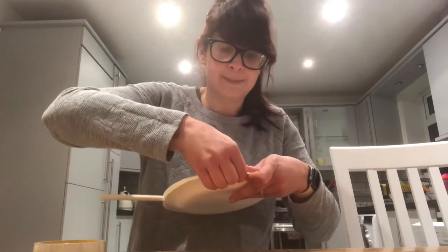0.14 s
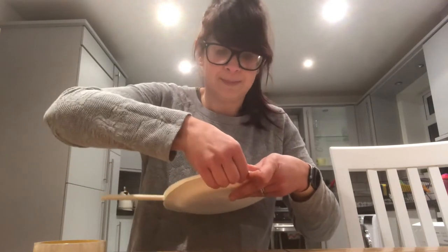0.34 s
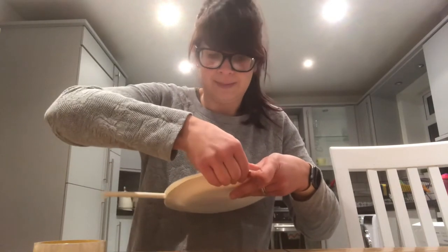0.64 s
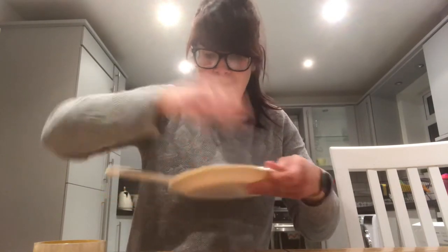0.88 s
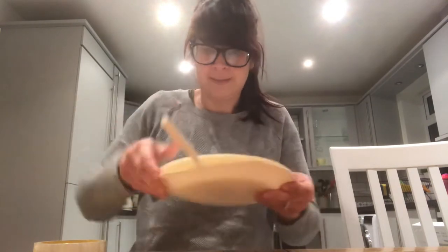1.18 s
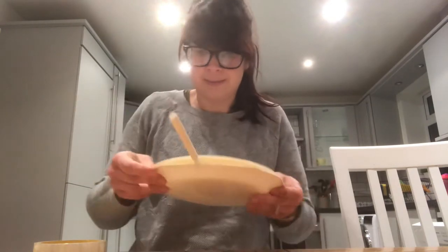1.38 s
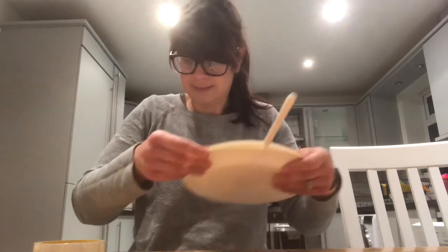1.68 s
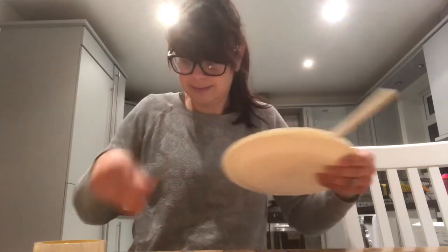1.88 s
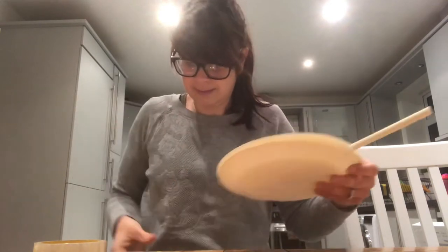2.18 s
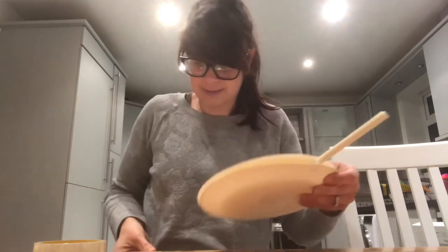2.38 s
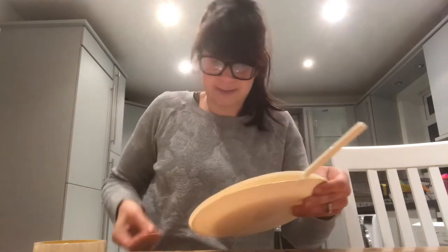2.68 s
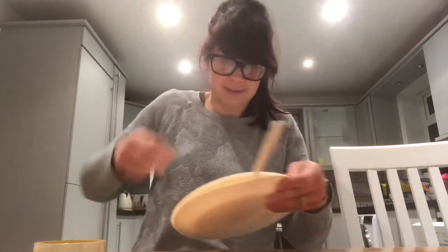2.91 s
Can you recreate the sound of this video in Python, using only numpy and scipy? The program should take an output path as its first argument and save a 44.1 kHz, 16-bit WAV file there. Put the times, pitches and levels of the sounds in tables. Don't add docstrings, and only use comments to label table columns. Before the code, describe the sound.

Paper plates crackle and click in handling, then sticky tape rips off in a loud burst

```python
import sys
import numpy as np
from scipy import signal
from scipy.fft import rfft, irfft, next_fast_len
from scipy.io import wavfile
from scipy.ndimage import uniform_filter1d, map_coordinates

SR = 44100
rng = np.random.default_rng(int(sys.argv[2]) if len(sys.argv) > 2 else 0)


def boost(x):
    u = np.asarray(x, float) / 20
    return 10 ** u


def inscribe(sig):
    pcm = np.round(np.clip(np.atleast_2d(sig).T, -1, 1) * 32767)
    wavfile.write(sys.argv[1], SR, pcm.astype(np.int16))


N = 134505

# [f/Hz, width/Hz, level/dB]
PLATE_MODES = [(437, 400, -3.5), (690, 530, -4), (1150, 250, 1.5), (1650, 192, 3.5), (3330, 2200, 0),
               (4450, 1120, 1.5), (6060, 1270, -2)]
PLATE_DETUNE = 0.042


def unit(x):
    return x / np.sqrt(np.mean(x ** 2) + 1e-20)


def along(points, hz):
    f, v = np.transpose(points)
    return np.interp(np.log(hz + 1), np.log(f + 1), v)


def filtered(x, response):
    m = next_fast_len(len(x) + 4096)
    spectrum = rfft(x, m) * response(np.fft.rfftfreq(m, 1 / SR))
    return irfft(spectrum, m)[:len(x)]


def peak(f, hz, width_hz):
    return 1j * f * width_hz / (hz * hz - f * f + 1j * f * width_hz + 1e-9)


def tilt(f, db_per_octave):
    return boost(db_per_octave * np.log2(np.maximum(f, 300) / 2000))


def new_grip():
    return PLATE_DETUNE * rng.standard_normal(len(PLATE_MODES))


def plate(f, detune, ring_hz, ring_db, q):
    rest = 0
    for k, (hz, width_hz, db) in enumerate(PLATE_MODES):
        rest = rest + (-1) ** k * boost(db) * peak(f, hz * (1 + detune[k]), width_hz)
    return np.abs(rest) + boost(ring_db) * peak(f, ring_hz, ring_hz / q)


def add(track, s, piece):
    i = round(s * SR)
    piece = piece[max(-i, 0):N - i]
    track[max(i, 0):][:len(piece)] += piece


def patchy(x, depth_db):
    z = signal.stft(x, nperseg=256)[2]
    field = uniform_filter1d(rng.standard_normal(z.shape), size=4, axis=0)
    field = uniform_filter1d(field, size=8, axis=1)
    return signal.istft(z * boost(depth_db * unit(field)), nperseg=256)[1][:len(x)]


def buckles():
    # [t/s, level/dB, body over snap/dB, tilt/(dB/octave), ring
    # f/Hz]
    pops = [(.0708, -52.5, 4.5, -1, 1800), (.108, -54, 3, -7, 2600), (.133, -41, -23, -6, 2480),
            (.146, -38.5, -30, 0, 6000), (.152, -32.5, -2, 1, 3620), (0.1531, -48, 9.5, -8, 503),
            (0.16, -37.5, -1, 0, 1450), (.1622, -37, 3, -7, 800), (0.174, -36.5, 1.5, -5.5, 1390),
            (.1742, -41.5, 4, -12, 646), (0.2159, -45, 6, -18, 1010), (.219, -39, 1, -7, 1240),
            (0.2201, -43, 4, -7.5, 590), (0.2305, -25, -14.5, -2, 3750), (.247, -41, -3, -6, 1390),
            (.359, -49, -10, 5, 8000), (0.411, -41, -3.5, -4, 1130), (.443, -54, -15, 7, 3600),
            (.463, -28, -2.5, 1.5, 507), (.469, -32, -15, -4.5, 3660), (0.5079, -28.5, -9.5, -7, 1570),
            (.525, -36.5, 0, 4.5, 870), (0.53, -35.5, -3, 3, 1100), (0.7225, -45, 2, 1, 4570),
            (0.7244, -29, -1, -4, 3640), (.7260, -32.5, 8.5, -6, 1400), (0.7272, -40.5, 7, -10, 428),
            (0.9383, -36.5, -3, -2.5, 3560), (.9388, -41.5, 9, -8.5, 1800),
            (0.9395, -45, 10, -7.5, 1050),
            (1.0913, -39.5, 4.4, -8, 1760), (1.094, -41.5, 3.7, -12, 880), (1.098, -41.5, 8.5, -11.5, 790),
             (1.103, -43.5, 5.2, -8, 1120), (1.11, -51, 4.6, -3, 1010), (1.136, -47, 5.1, -29, 1030),
             (1.198, -55, 8.7, 3, 1190), (1.2132, -34, 1.4, -8, 1820), (1.219, -41, 9, -6, 1650),
             (1.2237, -45.5, 7, -23, 1210), (1.240, -52, 5.2, -11.5, 403), (1.2552, -39.5, 3.5, -4, 1940),
             (1.385, -46, 2.3, 0, 1150), (1.473, -52, 6, -11, 1130), (1.5103, -42, 5.7, -6, 1640),
             (1.519, -45.5, 7.4, -2, 1290), (1.571, -59, 6, -3, 1700), (1.587, -57, 3.7, -8, 1500),
             (2.270, -57, 4, -2, 5550), (2.274, -61, 3, -4, 4330), (2.957, -54.5, 4.9, -3, 1100),
             (2.964, -58, 3.4, -7, 6500), (3.041, -48.5, 4.9, -5, 1180)]
    snap_t60_s, body_t60_s, body_attack_s = 0.008, 0.02, 0.0005
    snap_kick, body_kick = 3.5, 2.5
    out, t = np.zeros(N), np.arange(SR // 16) / SR
    for s, db, body_db, slope, hz in pops:
        a, b = rng.standard_normal((2, len(t)))
        detune = new_grip()

        a[:2] += snap_kick
        snap = filtered(a * boost(-60 * t / snap_t60_s), lambda f: tilt(f, slope) * peak(f, 4170, 6100))

        bump = np.exp(-(t * SR / 4 - 2) ** 2)
        b = b * (1 - np.exp(-t / body_attack_s)) + body_kick * bump
        body = filtered(b * boost(-60 * t / body_t60_s), lambda f: plate(f, detune, hz, ring_db=6, q=4.5)
                        * tilt(f, slope / 2) * peak(f, 3 * hz, 15 * hz) ** 2)

        click = snap / np.abs(snap).max() + boost(body_db) * body / np.abs(body).max()
        add(out, s, boost(db) * click)
    return out


def rubs():
    # [t/s, length/s, level/dB, tilt/(dB/octave), ring f/Hz]
    strokes = [(-.03, 0.055, -63, 1.5, 11400), (0.549, 0.16, -68, -2.5, 1090),
               (0.119, 0.17, -60.5, 0, 1280), (0.411, 0.056, -63, -1.5, 1070),
               (0.461, 0.13, -61.5, -1, 1010), (0.67, 0.067, -55.5, -1.8, 1700),
               (0.731, 0.091, -59.5, -2.5, 620), (0.957, 0.033, -61, -2.5, 1040),
               (1.03, 0.071, -58, 1.7, 4150), (1.082, 0.026, -51.5, 0.5, 4100),
               (1.11, .05, -55.5, -1.5, 1184), (1.169, 0.093, -52, -3, 1210), (1.276, .11, -53, -2, 1150),
               (1.437, 0.032, -54, 2, 1600), (1.46, 0.061, -53.5, 1.5, 4360),
               (1.452, 0.07, -55.5, -0.5, 1170), (1.507, 0.071, -48, -0.1, 1650),
               (1.516, 0.065, -50.5, 3.5, 4450), (1.598, 0.061, -57, -1, 1230),
               (1.866, 0.11, -62.5, 0.5, 990), (1.996, 0.046, -68.5, -0.5, 3800),
               (2.109, .15, -67, 0.5, 1240), (2.948, 0.023, -59.5, -1.5, 1110),
               (2.992, 0.049, -67.5, -3, 1110)]
    # [f/Hz, density level/dB]
    card_colour = [(120, -4.5), (200, -12), (333, -9.5), (379, -8.5), (1600, -7.5), (2100, -10),
                   (4350, -11.5), (15600, -15)]
    attack_s, release_s, grains_per_s = 0.014, 0.012, 14000
    grain_spread_db, flutter_db, broad_db = 2, 2.15, -9
    out, t = np.zeros(N), np.arange(SR // 3) / SR
    for s, length, db, slope, hz in strokes:
        hit, size, sign = rng.random((3, len(t)))
        grain_gain = boost(-grain_spread_db * np.log(size + 0.007))
        grains = (hit < grains_per_s / SR) * grain_gain * (sign - 0.5)
        detune = new_grip()
        sound = filtered(grains, lambda f: boost(along(card_colour, f)) * tilt(f, slope)
                         * (boost(broad_db) + np.abs(plate(f, detune, hz, ring_db=3, q=7))))
        flutter = np.tanh(map_coordinates(rng.standard_normal(40), [t * 90]))
        shape = np.clip(t / attack_s, 0, 1) * np.exp(-np.maximum(t - length, 0) / release_s)
        add(out, s, boost(db + flutter_db * flutter) * shape * unit(patchy(sound, depth_db=2.5)))
    return out


def thuds():
    thud_times = [.218, .463, .530, .726, .755, 1.095, 1.150, 1.215, 1.222, 1.380, 2.285, 2.575, 2.582,
                  2.585, 2.610]
    # [level/dB, f/Hz]
    thud_tones = [(-55.5, 121), (-41, 338), (-46.5, 135), (-47, 440), (-43.5, 330), (-55, 183), (-52, 80),
                  (-47, 97), (-41.5, 397), (-46.5, 318), (-60.5, 68), (-33, 510), (-40.5, 324), (-40, 165),
                  (-49.5, 58.5)]
    cycles = 5.34
    out, t = np.zeros(N), np.arange(SR // 8) / SR
    for s, (db, hz) in zip(thud_times, thud_tones):
        decay = boost(db - 60 * t * hz / (3 * cycles))
        onset = 1 - np.exp(-t * hz * 3)
        add(out, s, decay * onset * np.sin(2 * np.pi * hz * t))
    return out


def tape():
    # [t/s, level/dB, crackle length/s, brightest f/Hz, table ring/dB]
    slips = [(2.4666, -40, 0.0012, 7200, 5), (2.4933, -19.5, 0.00089, 11200, 2),
             (2.4949, -26, 0.0011, 4490, 6), (2.4993, -40, .0006, 9000, -6),
             (2.504, -40, 0.0022, 12000, -6), (2.5117, -40, .001, 13000, -4), (2.5138, -32, .0011, 7000, 0),
             (2.5214, -19, 0.0011, 6540, 4), (2.5219, -18, 0.0015, 4200, -2.5),
             (2.523, -21, 0.0013, 2980, 1), (2.5246, -22, 0.0031, 2640, 8.5),
             (2.5322, -20, 0.0016, 5000, -1), (2.5348, -21, 0.0014, 6000, -13),
             (2.5425, -25, 0.0012, 4370, -4), (2.545, -18, .0016, 7960, -15),
             (2.5496, -13, 0.00055, 5900, -9), (2.5516, -20, 0.00081, 5500, 2),
             (2.56, -16.5, 0.0018, 6400, 5), (2.5634, -15, 0.0027, 5470, -6.5),
             (2.5667, -24.5, 0.0014, 6000, -1), (2.5721, -10, 0.00074, 14700, -2),
             (2.5783, -14.5, 0.0014, 8600, -2.5), (2.5801, -11, 0.0017, 13600, -9),
             (2.5823, -19.5, 0.0017, 5960, 9.5), (2.587, -20, 0.0036, 6100, 0),
             (2.5904, -19.5, 0.0031, 14100, -11), (2.592, -19, .0022, 9260, -4),
             (2.5947, -18.5, 0.0019, 6100, 5.5), (2.5996, -14.5, .0012, 11100, 5),
             (2.6016, -26, .002, 7000, 9)]
    # [f/Hz, level/dB]
    strip_colour = [(180, -5), (300, 10), (378, -1), (509, -3), (1220, -1.5), (1940, -0.5), (6080, -4),
                    (15600, -5)]
    crackle_db, spike_db, slip_peak_db, slip_q = -8, -0.5, 4, 2
    table_hz, table_width_hz, film_low_hz = 1180, 600, 1500
    out, t = np.zeros(N), np.arange(SR // 50) / SR
    for s, db, length, hz, table_db in slips:
        noise, size = rng.standard_normal((2, len(t)))
        grit = noise * boost(3.2 * uniform_filter1d(size, size=5))
        crackle = grit * np.exp(-(t / length) ** 1.4) * boost(crackle_db)
        crackle[:2] -= boost(spike_db) * min(1, (0.0031 / length) ** 2)

        def film_and_table(f):
            film = (1 + boost(slip_peak_db) * peak(f, hz, hz / slip_q)) * 1j * f / (film_low_hz + 1j * f)
            return film + boost(table_db) * peak(f, table_hz, table_width_hz)

        add(out, s, boost(db - 3.5) * filtered(crackle, film_and_table))
    return filtered(out, lambda f: boost(along(strip_colour, f) + 4.0))


def kitchen(x):
    # [f/Hz, t60/s]
    decay_times = [(150, 0.47), (1000, 0.65), (4000, 0.56), (8000, 0.46), (14000, 0.34)]
    wall_s = 0.0013
    out, hop = np.zeros(N + 2 * SR), SR // 8
    for i in range(0, N, hop):
        hz, t, z = signal.stft(rng.standard_normal(SR * 3 // 4), SR, nperseg=256)
        fade = boost(-60 * t / along(decay_times, hz)[:, None])
        tail = signal.istft(z * fade, SR, nperseg=256)[1]
        tail *= 1 - np.exp(-np.arange(len(tail)) / (SR * wall_s))
        wet = signal.fftconvolve(x[i:i + hop], tail / np.linalg.norm(tail))
        out[i:i + len(wet)] += wet
    return out[:N]


def floor():
    # [f/Hz, density level/dB]
    hiss_colour = [(15, -53), (25, -11), (91, -2.5), (144, -7.5), (315, -9), (485, -17.5), (570, -14.5),
                   (1250, -19), (15700, -37.5)]
    # [t/s, level/dB]
    drone_swell = [(0, -79), (.5, -76), (1.2, -87), (1.9, -64), (2.5, -68), (3.05, -100)]
    hiss_db, drone_hz, drone_width_hz = -63, 304, 76
    hiss = unit(filtered(rng.standard_normal(N), lambda f: boost(along(hiss_colour, f))))
    drone = unit(filtered(rng.standard_normal(N), lambda f: peak(f, drone_hz, drone_width_hz) ** 2))
    drone_db = np.interp(np.arange(N) / SR, *np.transpose(drone_swell))
    return boost(hiss_db) * hiss + boost(drone_db) * drone


def scene():
    card = buckles() + rubs() + thuds()
    strip = tape()
    room = kitchen(boost(-7.5) * card + boost(-5.5) * strip)
    return (card + strip + room + floor())[None]


def band_limit(x):
    return signal.sosfilt(signal.butter(12, 16830, fs=SR, output="sos"), x)


def record(dry):
    # [f/Hz, width/Hz, depth 0-1]
    notches = [(2040, 350, 0.18), (5000, 236, 0.45), (7700, 630, 0.23), (10400, 1500, 0.43)]
    # [f/Hz, level/dB]
    mic_band = [(20, -20), (45, 0), (15300, 0), (15720, -5), (15850, -28), (16400, -33), (16830, -50)]

    def microphone(f):
        response = boost(along(mic_band, f))
        for hz, width_hz, depth in notches:
            response = response * (1 - depth * peak(f, hz, width_hz))
        return response

    return band_limit(filtered(dry[0], microphone)[None])


dry = scene()
out = record(dry)
inscribe(out)
```